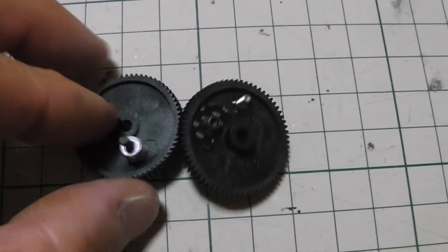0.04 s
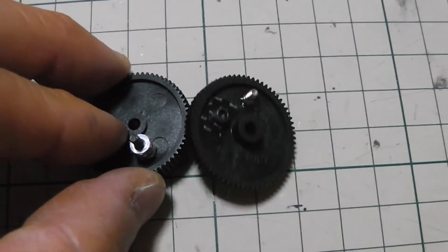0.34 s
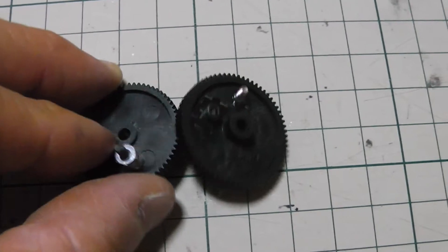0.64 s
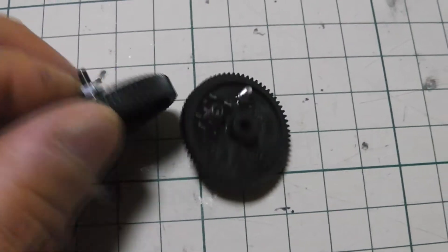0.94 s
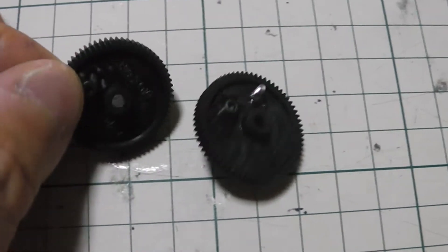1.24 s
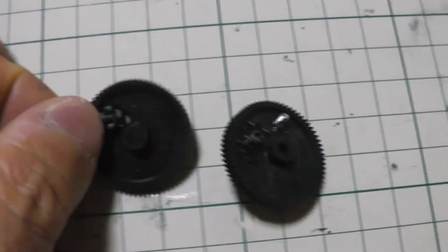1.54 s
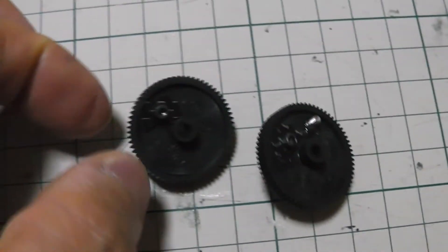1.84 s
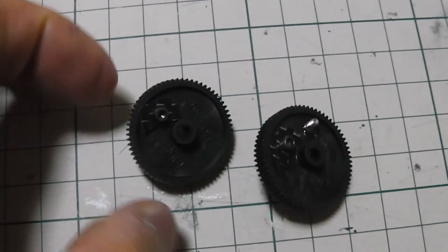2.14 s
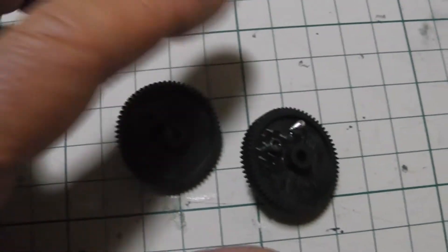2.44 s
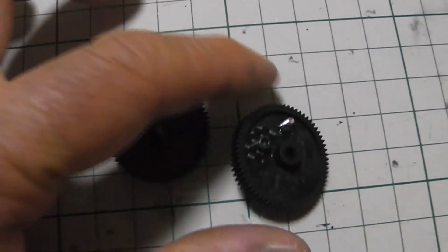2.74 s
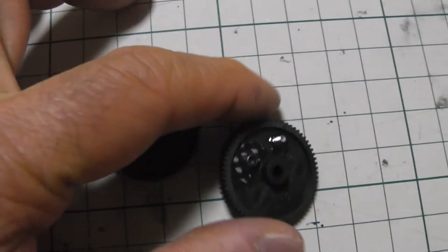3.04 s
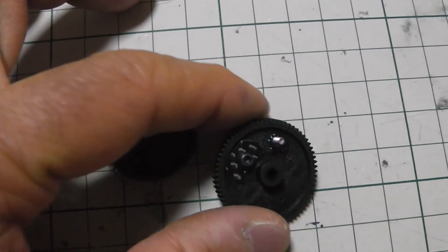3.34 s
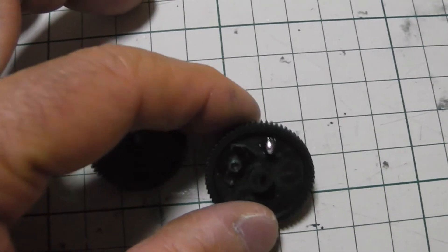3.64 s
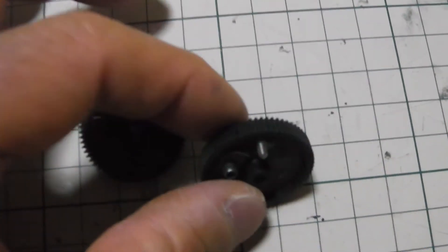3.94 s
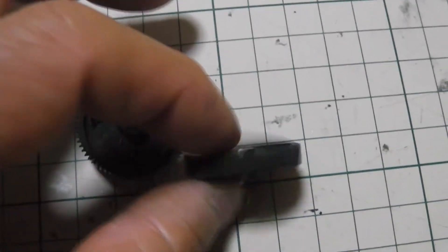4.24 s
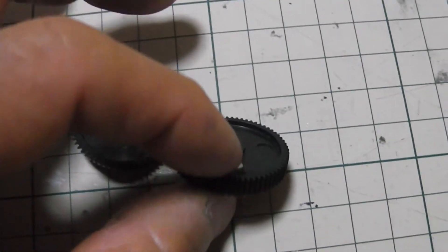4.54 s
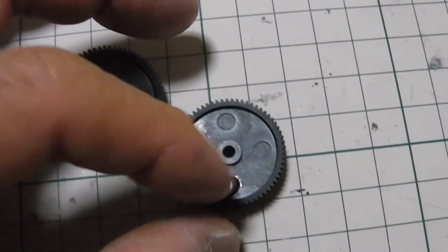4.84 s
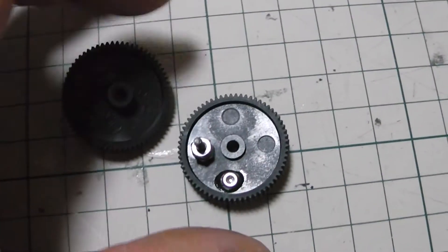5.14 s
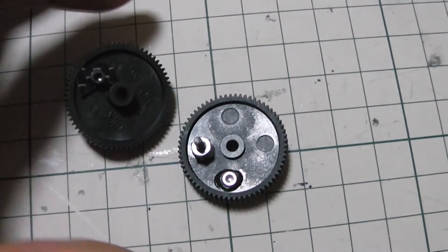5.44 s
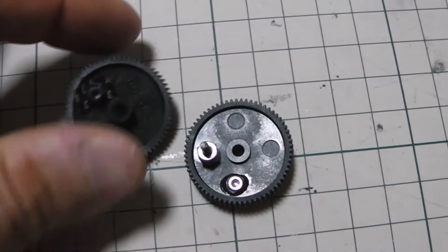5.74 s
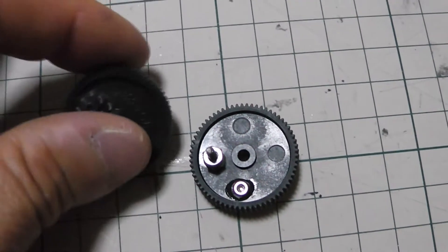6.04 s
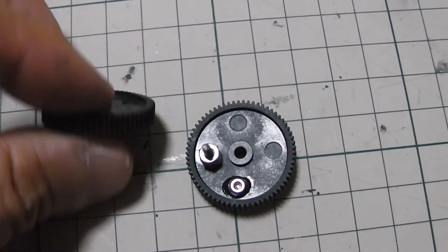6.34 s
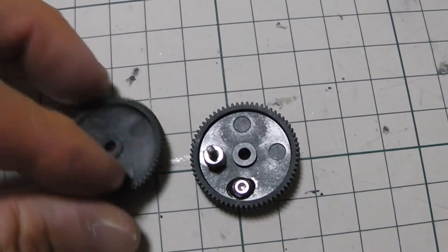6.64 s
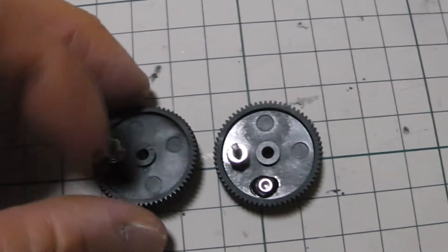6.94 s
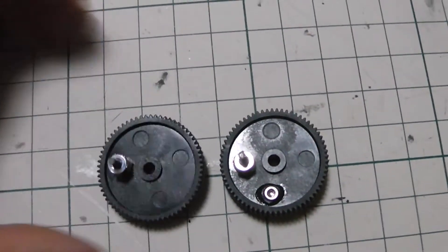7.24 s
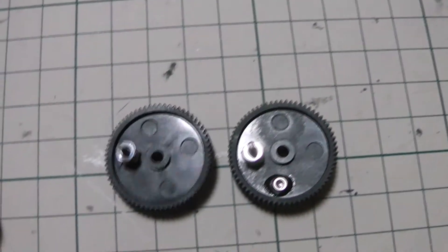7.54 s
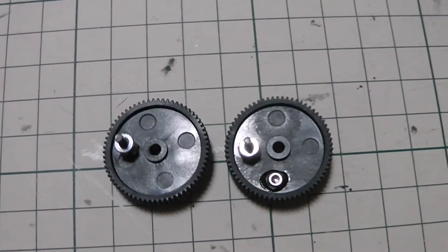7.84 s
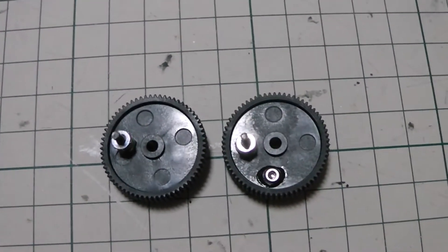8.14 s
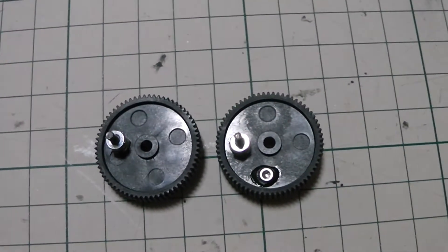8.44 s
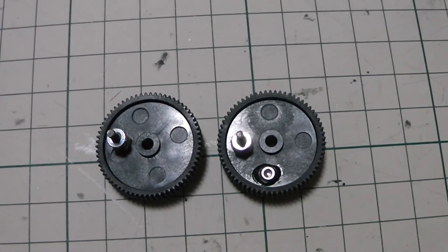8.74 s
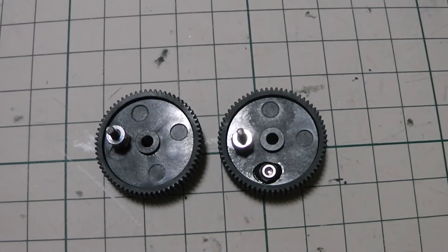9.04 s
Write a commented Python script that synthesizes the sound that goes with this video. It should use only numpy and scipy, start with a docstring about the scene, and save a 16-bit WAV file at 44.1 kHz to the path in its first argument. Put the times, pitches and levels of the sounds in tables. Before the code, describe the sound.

Fingers pick up two small plastic gears, turn them over and lay them on a cutting mat. Their rims knock and scrape, fingertips rasp thinly over the teeth, and four times a gear lands flat with a quick rebound. Then the hand brushes softly across the mat and a few faint dry ticks follow. It is all heard up close in a small room with a steady fan-like rush and a low hum.

```python
"""Two small plastic gears are picked up, turned over and laid down on a cutting mat, heard up close.
Their rims knock, rebound and scrape, ringing disc and teeth over the thud of the mat and the table.
Fingertips rasp over the teeth in tiny slips, and the hand hisses across the mat between moves.
A few faint dry ticks follow once the hand has gone; a fan-like rush and a low hum fill the small room."""
import sys
import numpy as np
from scipy import signal
from scipy.fft import rfft, irfft, next_fast_len
from scipy.io import wavfile

SR = 44100
rng = np.random.default_rng(int(sys.argv[2]) if len(sys.argv) > 2 else 0)


def wrap_up_sound(samples):
    """Save the sound to the file named by the first command line argument, as 16-bit audio."""
    columns = np.atleast_2d(samples).T
    # keep every value between -1 and 1, then stretch to whole-number steps
    tamed = np.clip(columns, -1, 1)
    steps = np.round(tamed * 32767).astype(np.int16)
    wavfile.write(sys.argv[1], SR, steps)


N = 405279
TIME = np.arange(N) / SR


def from_db(db):
    """Decibels to gain."""
    return 10 ** (np.asarray(db) / 20)


def rms_one(x):
    """Scale to an rms of 1."""
    return x / np.sqrt(np.mean(x ** 2) + 1e-20)


def add(track, s, sound):
    """Mix a sound into a track, s seconds in."""
    at = max(round(s * SR), 0)
    track[at:at + len(sound)] += sound[:max(N - at, 0)]


def drift(size, rate):
    """A random wander that heads for a new value rate times a second."""
    knots = rng.standard_normal(int(size * rate / SR) + 2)
    return np.interp(np.arange(size) * rate / SR, np.arange(len(knots)), knots)


def at_hz(points, hz):
    """Read a curve of (Hz, value) points on a log-frequency axis."""
    point_hz, value = np.transpose(points)
    return np.interp(np.log(hz + 1e-3), np.log(point_hz), value)


def coloured_noise(spectrum, likeness):
    """Stereo noise with a given spectrum and left-right likeness; rms 1."""
    size = next_fast_len(N)
    hz = np.fft.rfftfreq(size, 1 / SR)
    mid, side = rfft(rng.standard_normal((2, size)))
    alike = np.clip(at_hz(likeness, hz), 0, 1)
    stereo = np.sqrt(1 + alike) * mid + np.sqrt(1 - alike) * side * [[1], [-1]]
    return rms_one(irfft(stereo * from_db(at_hz(spectrum, hz)), size)[:, :N])


def resonance(x, hz, width_hz):
    """One resonant band with unity gain at its peak."""
    radius = np.exp(-np.pi * width_hz / SR)
    feedback = [1, -2 * radius * np.cos(2 * np.pi * hz / SR), radius ** 2]
    return signal.lfilter(np.array([1, 0, -1]) * (1 - radius ** 2) / 2, feedback, x)


def struck(modes, tilt=0, detune=0.023, lag_cycles=0.31, scatter_db=2.5):
    """A body rings, tilted in dB per octave; the grip shifts each mode's level and pitch; peak 1."""
    hz, db, t60 = np.transpose(modes)[:, :, None]
    strength, shift = rng.standard_normal((2, *hz.shape))
    # each mode arrives by its own path, part of a cycle late
    t = np.maximum(TIME[:SR // 10] - lag_cycles * rng.random(hz.shape) / hz, 0)
    level = from_db(db + tilt * np.log2(hz) + scatter_db * strength - 60 * t / t60)
    ring = np.sum(level * np.sin(2 * np.pi * hz * (1 + detune * shift) * t), axis=0)
    return ring / np.abs(ring).max()


def slips(size, per_s, spread_db):
    """Stick and slip: tiny clicks of uneven size at random moments."""
    chance, sign = rng.random((2, size))
    sizes = from_db(spread_db * np.minimum(rng.exponential(1, size), 4))
    return (chance < per_s / SR) * sizes * np.sign(sign - .5)


def stroke(start, end, roundness, jerk_db, lateness=1.1):
    """Pressure of one short stroke: it swells, jerks and lets go; rms 1."""
    progress = np.linspace(0, 1, max(int((end - start) * SR), 4))
    swell = np.abs(np.sin(np.pi * progress ** lateness)) ** roundness
    return rms_one(swell * from_db(jerk_db * drift(len(progress), rate=123)))


# The dark bed of room tone. Each row: frequency in Hz, relative level in dB.
AIR_SPECTRUM = [(12, -62), (20, -22), (32, -11), (60, -14), (150, -9), (177, -13.5), (222, -10),
                (434, -17.5), (660, -18), (1190, -25), (1440, -25), (1910, -32), (2750, -45.5),
                (5680, -41.5), (16000, -50)]
# Its stereo image, centred lows and wide highs. Each row: frequency in Hz, likeness from 0 to 1.
AIR_LIKENESS = [(50, 0.94), (200, 0.98), (800, 0.72), (2000, 0.37), (4000, 0.067), (15000, 0.057)]
# Resonances that colour the rush. Each row: centre in Hz, nominal width in Hz, rms level in dB.
RUSH_BANDS = [(207.8, 20.3, -53.5), (322.7, 22.6, -58.5), (480.5, 16.3, -57.5), (551.6, 27, -61),
              (652, 31.5, -58), (770, 29.5, -56.5), (887, 74, -58.5), (1580, 190, -73.5), (1893, 76, -73)]


def fan_rush(air_db=-47):
    """A steady fan-like rush: dark noise with a few broad resonances."""
    air = from_db(air_db) * coloured_noise(AIR_SPECTRUM, AIR_LIKENESS)
    for hz, width, db in RUSH_BANDS:
        band = resonance(rng.standard_normal(N), hz, width * 2)
        air += from_db(db) * rms_one(resonance(band, hz, width * 2))   # twice, for steeper skirts
    return air


# The fader ride of the hum. Each row: time in seconds, relative level in dB.
HUM_SWELLS = [(0.0, -57), (1.23, -57), (2.76, -46.5), (4.1, -48), (4.45, -63), (4.55, -47), (4.94, -57),
              (5.5, -47.5), (5.76, -58), (9.11, -53), (9.19, -65)]


def low_hum(hum_hz=64.45, trim_db=-1.0, waver=0.093, mains_hz=102.1, mains_db=-61):
    """A wavering low hum swells and sinks beside a steady mains tone."""
    unsteady = rms_one(resonance(rng.standard_normal(N), hum_hz, width_hz=6.2))
    hum = rms_one(np.sin(2 * np.pi * hum_hz * TIME) + waver * unsteady)
    swell = from_db(np.interp(TIME, *np.transpose(HUM_SWELLS)) + trim_db)
    mains = rms_one(np.sin(2 * np.pi * mains_hz * TIME))
    return swell * hum + from_db(mains_db) * mains


def reflections(x, near_db=-13, near_t60=0.096, far_db=-18, far_t60=0.11, wall_hz=2500):
    """Quick scatter from the hand and desk, and the faint dull tail of a small room."""
    t = TIME[:SR // 2]
    near, far = rng.standard_normal((2, 2, len(t))) * (t > .001)
    near = near * from_db(-60 * t / near_t60)
    far = far * from_db(-60 * t / far_t60)
    near, far = (tail / np.linalg.norm(tail, axis=1, keepdims=True) for tail in (near, far))
    far = signal.lfilter(*signal.butter(1, wall_hz, fs=SR), far)
    response = from_db(near_db) * near + from_db(far_db) * far
    return signal.fftconvolve(x[None], response, axes=1)[:, :N]


# The low knock and bright top of a tick. Each row: mode in Hz, relative level in dB, t60 in seconds.
TICK_KNOCK_MODES = [(230, -10, .04), (504, 0.5, 0.022), (792, 4.5, 0.029), (990, 1, 0.03), (1227, 1, .016),
                    (1460, 2.5, 0.021), (1960, -26, .01)]
TICK_TOP_MODES = [(3360, -23, .005), (4330, 3.5, 0.0045), (5460, 9, 0.008), (6300, -17, .005),
                  (7640, 0, 0.0053), (10400, 1.5, 0.0053), (13600, -5, .003)]
# The closing ticks. Each row: start in seconds, relative level in dB.
TICK_CUES = [(8.426, -35), (8.456, -34), (8.484, -30.5), (8.521, -33.5), (8.552, -30.5), (8.596, -27.5),
             (8.651, -31), (8.684, -30), (8.809, -28.5), (9.074, -24)]


def dry_ticks(catch_s=0.00158, lead_db=-5, knock_db=1.0, top_db=-12.0):
    """Small dry double ticks: a light touch, then the catch."""
    out = np.zeros(N)
    for s, level in TICK_CUES:
        for at, db in (s, level + lead_db), (s + catch_s, level):
            add(out, at, from_db(db + knock_db) * struck(TICK_KNOCK_MODES, detune=0.03, lag_cycles=0.26))
            add(out, at, from_db(db + top_db) * struck(TICK_TOP_MODES, detune=0.052, lag_cycles=0.54))
    return out


# The colour of skin brushing the mat. Each row: frequency in Hz, relative level in dB.
SKIN_SPECTRUM = [(200, -9), (700, 4), (1200, 7.5), (1800, 7), (2150, -4), (2650, -10.5), (3400, -5),
                 (5000, -4), (7000, -0.5), (9000, 2.5), (11000, 0.5), (13500, -3.5), (16000, -12)]
# Passes of the hand. Each row: start, fastest moment and end in seconds, relative level in dB,
# gap resonance over the hiss in dB, left over right in dB.
SLIDE_CUES = [(2.42, 2.562, 2.64, -53.5, -31, 1.5), (2.59, 2.68, 2.81, -56, -26, 1),
              (2.82, 2.886, 3.03, -60, -24, 0), (5.083, 5.44, 5.6, -52, -23, 1),
              (5.42, 5.536, 5.68, -49, -12, 1.5), (7.259, 7.398, 7.52, -44, -9.5, 2),
              (7.378, 7.47, 7.6, -47, -15, 3), (7.503, 7.6, 7.71, -56.5, -17, 5),
              (7.69, 7.865, 7.99, -44.5, -17.5, 3.5)]


def hand_slides(trim_db=3.5, flutter_db=1.14, gap_hz=4750, speed_power=0.93):
    """The hand brushes the mat: the hiss follows its speed, coloured by the gap under the hand."""
    hiss_power, gap_power = np.zeros((2, 2, N))
    for start, fastest, end, db, gap_db, left_db in SLIDE_CUES:
        speed = np.interp(TIME, [start, fastest, end], [0, 1, 0])
        panned_gain = from_db(db + left_db * np.array([[.5], [-.5]]))
        power = (panned_gain * speed ** speed_power) ** 2
        hiss_power += power
        gap_power += from_db(gap_db) ** 2 * power
    # the gap rings as a band of noise
    wander = drift(N, rate=1700) + 1j * drift(N, rate=1700)
    gap = rms_one(np.real(np.exp(2j * np.pi * gap_hz * TIME) * wander))
    hiss = coloured_noise(SKIN_SPECTRUM, likeness=[(200, 1.0), (16000, 0.81)])
    grip_db = flutter_db * drift(N, rate=170)
    return from_db(trim_db + grip_db) * (np.sqrt(hiss_power) * hiss + np.sqrt(gap_power) * gap)


# A gear held in the fingers. Each row: start and end in seconds, teeth ring in dB, skin hiss in dB.
HOLD_CUES = [(0.303, 0.799, -76, -77), (0.9, 1.497, -73.5, -69), (2.929, 3.451, -74, -70.5),
             (3.421, 4.0, -78, -80), (4.078, 4.402, -91, -66), (4.395, 4.703, -76, -75),
             (5.945, 6.5, -71.5, -77), (6.82, 7.258, -80, -69.5)]


def grip_creep(teeth_hz=10000, skin_hz=8000, grip_db=2.5, grips_per_s=14):
    """Under a shifting grip, skin creeps over the teeth: a thin, uneven rasp that comes and goes."""
    out = np.zeros(N)
    for start, end, ring, hiss in HOLD_CUES:
        pressure = stroke(start, end, roundness=0.27, jerk_db=3.5)
        pressure = rms_one(pressure * from_db(grip_db * drift(len(pressure), grips_per_s)))
        grains = slips(len(pressure), per_s=1900, spread_db=3.5)
        teeth = from_db(ring) * rms_one(resonance(grains, teeth_hz, width_hz=750))
        skin = from_db(hiss) * rms_one(resonance(grains, skin_hz, width_hz=6000))
        add(out, start, pressure * (teeth + skin))
    return out


# Fingertip slips. Each row: start and end in seconds, teeth ring and skin hiss in relative dB.
RUB_CUES = [(0.003, 0.1, -61, -62), (0.128, 0.184, -51, -54.5), (0.182, 0.318, -58.5, -66),
            (0.553, 0.615, -51.5, -52.5), (0.814, 0.909, -50, -56.5), (1.117, 1.142, -45.5, -53),
            (1.126, 1.218, -62, -63), (1.485, 1.641, -65, -62.5), (1.796, 1.846, -61.5, -80),
            (2.918, 2.96, -62, -62), (3.866, 3.94, -63, -75), (3.966, 4.062, -59, -65),
            (4.375, 4.419, -52, -62), (4.716, 4.882, -57.5, -67), (5.962, 6.075, -62, -60.5),
            (6.174, 6.29, -53.5, -53), (6.264, 6.336, -45.5, -49), (6.539, 6.678, -63, -61),
            (6.691, 6.81, -53.5, -58)]


def fingertip_rubs(teeth_hz=10200, grip_shift=0.012, teeth_db=-2.0, skin_db=-3.0, disc_db=-11, mat_db=-2):
    """Skin ridges flick over the teeth: fine grains ring teeth and disc over a broad hiss."""
    out = np.zeros(N)
    skin_band = signal.butter(2, [3600, 9000], "band", fs=SR, output="sos")
    mat_band = signal.butter(3, [1000, 1900], "band", fs=SR, output="sos")
    for start, end, ring, hiss in RUB_CUES:
        hz = teeth_hz * (1 + grip_shift * rng.standard_normal())
        pressure = stroke(start, end, roundness=.65, jerk_db=2.5)
        grains = slips(len(pressure), per_s=5000, spread_db=2.0)
        teeth = rms_one(resonance(grains, hz, width_hz=1400))
        disc = from_db(disc_db) * rms_one(resonance(grains, 0.606 * hz, width_hz=420))
        skin_grains = slips(len(pressure), per_s=16000, spread_db=8.0)
        skin = rms_one(signal.sosfilt(skin_band, skin_grains))
        mat = from_db(mat_db) * rms_one(signal.sosfilt(mat_band, grains))
        ringing = from_db(ring + teeth_db) * (teeth + disc)
        friction = from_db(hiss + skin_db) * (skin + mat)
        add(out, start, pressure * (ringing + friction))
    return out


# The table's low end. Each row: mode in Hz, relative level in dB, t60 in seconds.
TABLE_MODES = [(173.7, -4.5, 0.12), (243, -9, 0.077), (320, -5.5, 0.089), (642, -8, 0.056),
               (771, 1.5, 0.058)]


def table_boom(tilt):
    """The table booms briefly under the mat; peak 1."""
    return struck(TABLE_MODES, tilt)


# The dull body of the mat. Each row: mode in Hz, relative level in dB, t60 in seconds.
MAT_MODES = [(185, -13, .045), (300, -17, .035), (455, -12, .028), (565, -12, .028), (745, -2, .027),
             (850, -7, .016), (1160, -4, .014), (1305, -3, .02), (1450, -2, .017), (1780, -4, .013),
             (1970, -1, .016)]


def mat_thud(tilt, rebound=0.52, rebound_s=0.000456, soft_hz=2500):
    """The soft mat gives way, springs back and swallows the treble; peak 1."""
    push = struck(MAT_MODES, tilt, detune=.025, lag_cycles=.2)
    t = TIME[:len(push)]
    thud = push - rebound * np.interp(t - rebound_s, t, push, left=0)
    thud = signal.sosfilt(signal.butter(2, soft_hz, fs=SR, output="sos"), thud)
    return thud / np.abs(thud).max()


# The plastic tick of a gear's disc. Each row: mode in Hz, relative level in dB, t60 in seconds.
DISC_MODES = [(2770, -36, 0.0062), (3800, -13, 0.0028), (4280, 4.5, 0.0055), (5770, 0.5, 0.0063),
              (6700, -1.5, 0.0073), (6900, -14, 0.0038), (7860, 0.5, 0.0024)]


def disc_tick(tilt=0, detune=0.087, lag_cycles=0.31):
    """The plastic disc rings for a few milliseconds; peak 1."""
    return struck(DISC_MODES, tilt, detune, lag_cycles)


# A rim drags over the mat. Each row: start and end in seconds, relative level in dB,
# brightness in dB per octave.
SCRAPE_CUES = [(0.842, 0.895, -41.5, -5), (0.979, 1.06, -39.5, 3.5), (1.115, 1.139, -38, 10.5),
               (2.923, 2.963, -45, -7), (4.001, 4.058, -51.5, 12.5), (4.104, 4.175, -49, -2),
               (4.374, 4.4, -40.5, -4.5), (4.837, 4.92, -47, 0), (5.768, 5.807, -52, 7),
               (5.965, 5.992, -46, 8), (6.182, 6.277, -46.5, 5), (6.254, 6.297, -32.5, 9.5),
               (6.292, 6.332, -35, -0.5)]


def rim_scrapes(mat_db=-1.0, table_db=-8, disc_db=-21, disc_follows=0.95):
    """Teeth catch in quick succession, shaking mat, table and disc; bright scrapes have more disc."""
    out = np.zeros(N)
    for start, end, level, tilt in SCRAPE_CUES:
        pressure = stroke(start, end, roundness=0.69, jerk_db=-1.5, lateness=0.76)
        clicks = pressure * slips(len(pressure), per_s=2300, spread_db=3.5)
        bodies = [(mat_thud(tilt), mat_db), (table_boom(tilt), table_db),
                  (disc_tick(), disc_db + disc_follows * tilt)]
        for body, db in bodies:
            shaken = signal.fftconvolve(clicks, body)[:len(clicks)]
            add(out, start, from_db(level + db) * rms_one(shaken))
    return out


def crack(t60=0.0068, low_hz=6500):
    """The instant of impact: a very short, bright burst; peak 1."""
    t = TIME[:SR // 50]
    burst = rng.standard_normal(len(t)) * from_db(-60 * t / t60)
    burst = signal.sosfilt(signal.butter(2, low_hz, "high", fs=SR, output="sos"), burst)
    return burst / np.abs(burst).max()


# The thin ping of the teeth. Each row: mode in Hz, relative level in dB, t60 in seconds.
TEETH_MODES = [(9900, -7, 0.0043), (10060, 10, 0.011), (10500, -18, .003), (11700, -2, 0.0095),
               (13800, -21, .002)]


def impact(thud, tick, ring, tilt, mat_db=-1.0, teeth_db=2.5, crack_db=3.5, table_db=-10,
           hardness=0.86, soft_blow_db=-28):
    """A hit cracks, thuds in mat and table, and rings disc and teeth; hard blows brighten the disc."""
    disc_tilt = hardness * max(tick - soft_blow_db, 0)
    out = from_db(thud + mat_db) * mat_thud(tilt)
    add(out, 0, from_db(tick) * disc_tick(disc_tilt, detune=0.055, lag_cycles=0.43))
    add(out, 0, from_db(ring + teeth_db) * struck(TEETH_MODES, detune=0.011, lag_cycles=0.43))
    add(out, 0, from_db(ring + crack_db) * crack())
    add(out, 0, from_db(thud + table_db) * table_boom(tilt))
    return out


def rim_touch(thud, tick, usual_tick_under_db=15.5, teeth_under_db=15.5, brightening=0.74):
    """The rim touches down: the teeth ring with the tick, and a harder tick brightens the thud."""
    tilt = brightening * (tick - thud + usual_tick_under_db)
    return impact(thud, tick, tick - teeth_under_db, tilt)


# Knocks of a rim. Each row: start in seconds, mat thud and disc tick in relative dB.
KNOCK_CUES = [(0.8474, -24, -47), (0.8515, -22.5, -35), (0.8654, -19.5, -30), (0.959, -32, -41.5),
              (0.984, -27.5, -50), (1.0112, -22.5, -34), (1.029, -23.5, -46), (1.1269, -22, -38),
              (1.15, -22, -35), (2.9396, -26.5, -46), (3.3218, -28, -43), (3.816, -30, -40),
              (3.9093, -34, -43.5), (3.9944, -27.5, -40.5), (4.139, -31, -50), (4.2154, -29, -51),
              (4.4317, -44, -44), (4.4651, -27.5, -51), (4.9154, -24, -46), (4.9274, -29, -40),
              (5.976, -27, -39), (6.2835, -21, -34), (6.321, -19, -23.5), (6.4288, -23, -40.5),
              (6.7842, -19, -32)]


def rim_knocks():
    """A rim knocks on the mat as the gear is handled, or taps down again late after a fall."""
    out = np.zeros(N)
    for s, thud, tick in KNOCK_CUES:
        add(out, s, rim_touch(thud, tick))
    return out


# Flat landings. Each row: start in seconds, mat thud, disc tick and teeth ring in relative dB,
# thud brightness in dB per octave, gap to the first rebound in seconds, its loss of thud in dB.
DROP_CUES = [(1.6329, -13, -27.5, -36, 0.5, .0265, 12), (4.37, -15, -27.5, -52, 0, 0.012, 11),
             (4.8779, -11.5, -10, -18, -3.5, .0093, 2), (6.7854, -14, -22.5, -39, 3, 0.0072, 16)]


def gear_drops(rebounds=3, gap_shrink=.8, rebound_loss_db=10, tick_fade=1.32):
    """A gear falls flat and rebounds on its rim, ever sooner and weaker; the tick fades fastest."""
    out = np.zeros(N)
    for s, thud, tick, ring, tilt, gap, loss in DROP_CUES:
        add(out, s, impact(thud, tick, ring, tilt))
        for _ in range(rebounds):
            s += gap
            add(out, s, rim_touch(thud - loss, tick - tick_fade * loss))
            gap *= gap_shrink
            loss += rebound_loss_db
    return out


def scene():
    """Gears and ticks sit dead centre with a little room, over the hand slides and the room tone."""
    centre = rim_knocks() + gear_drops() + rim_scrapes() + fingertip_rubs() + grip_creep() + dry_ticks()
    return centre + reflections(centre) + hand_slides() + fan_rush() + low_hum()


def record(dry, port_band_hz=(11300, 15600), port_lean=0.3, cutoff_hz=15900):
    """The left microphone port is brighter than the right at the very top; the treble ends steeply."""
    top = signal.sosfilt(signal.butter(2, port_band_hz, "band", fs=SR, output="sos"), dry)
    leaning = dry + port_lean * top * [[1], [-1]]
    return signal.sosfilt(signal.ellip(12, .1, 80, cutoff_hz, fs=SR, output="sos"), leaning)


dry = scene()
out = record(dry)
wrap_up_sound(out)
```